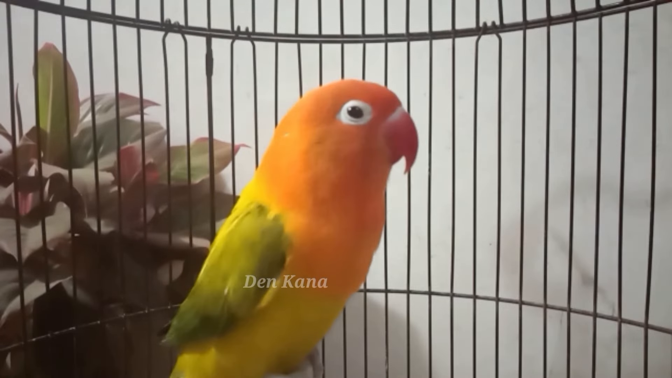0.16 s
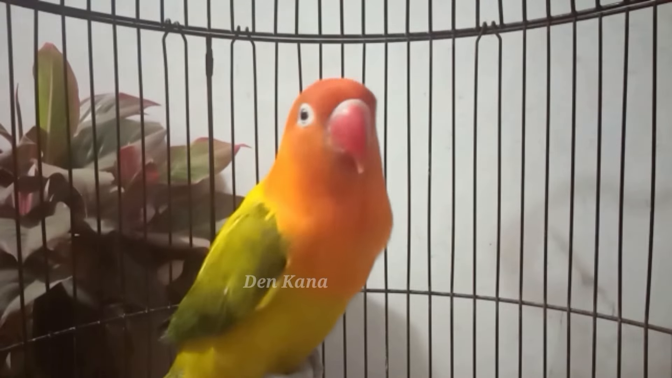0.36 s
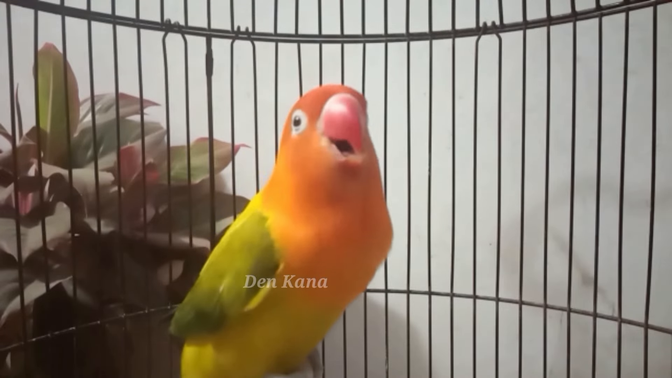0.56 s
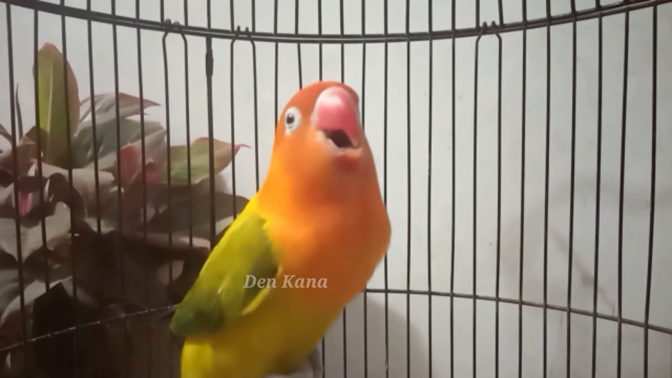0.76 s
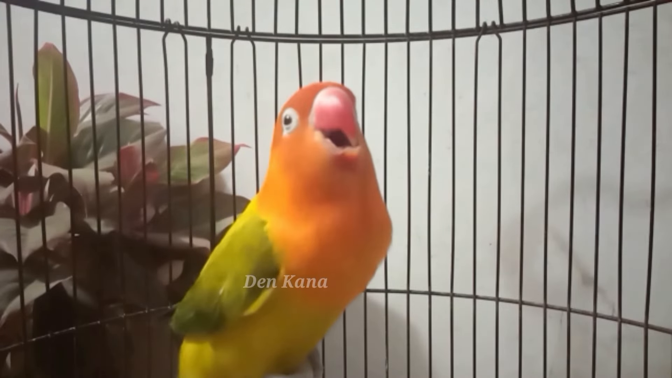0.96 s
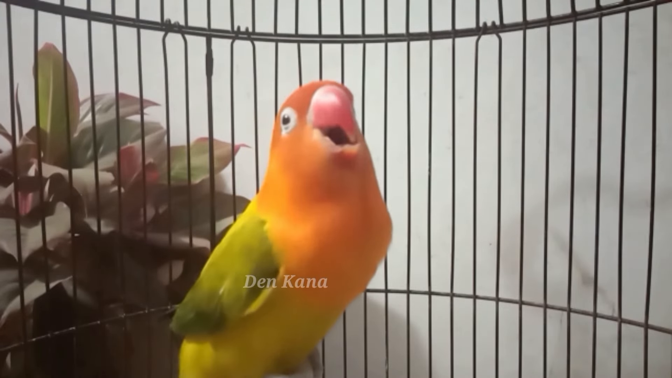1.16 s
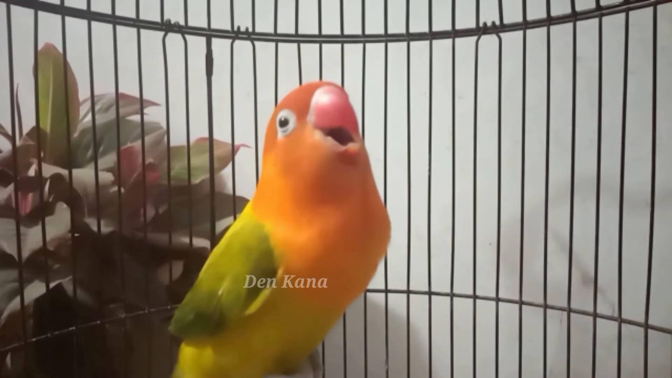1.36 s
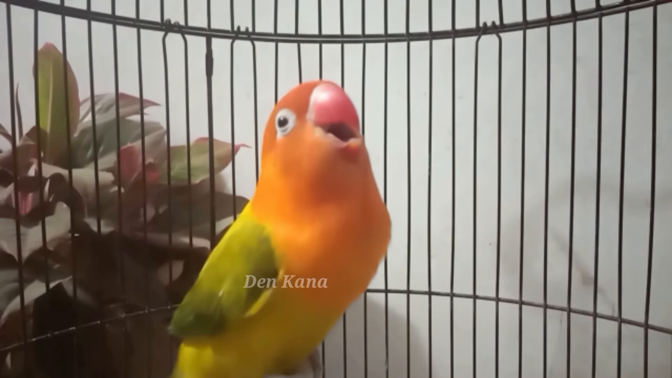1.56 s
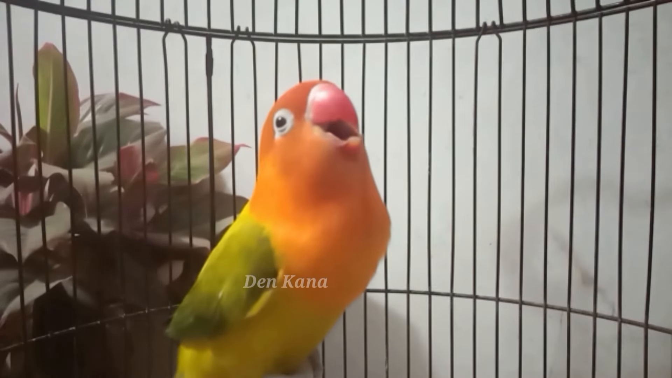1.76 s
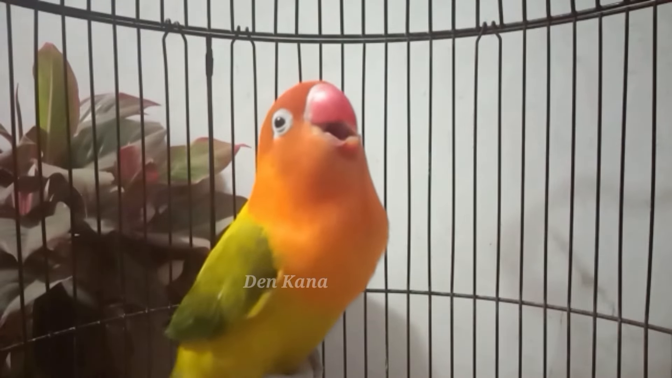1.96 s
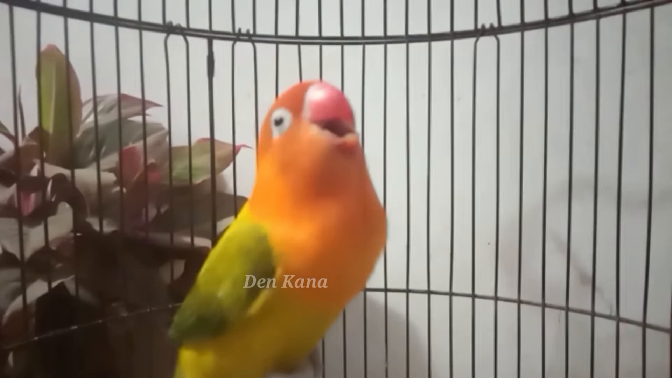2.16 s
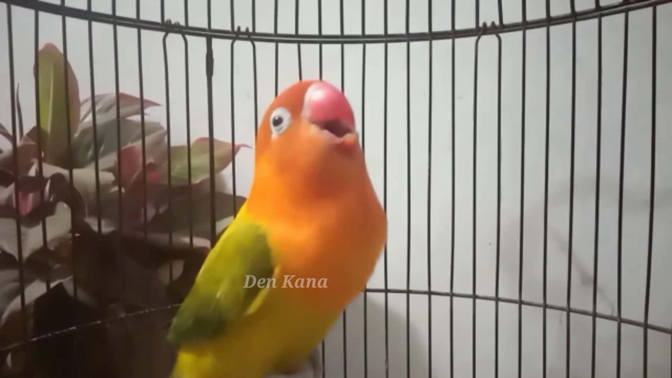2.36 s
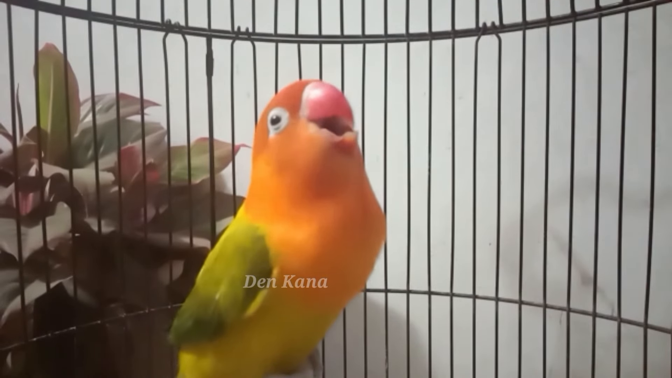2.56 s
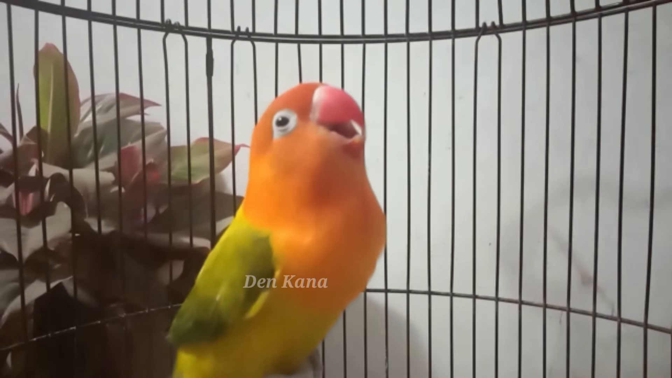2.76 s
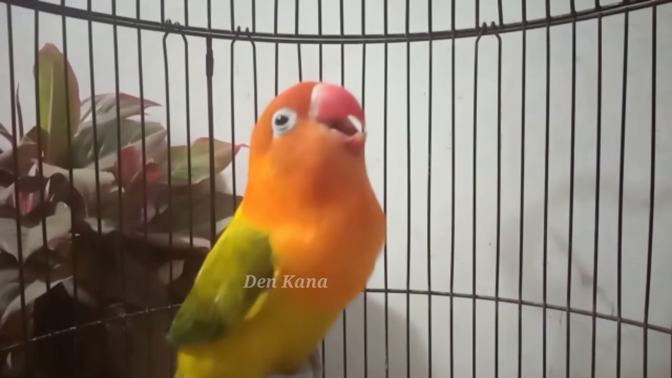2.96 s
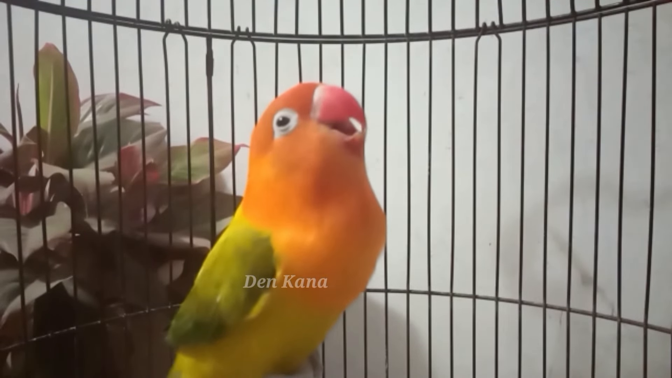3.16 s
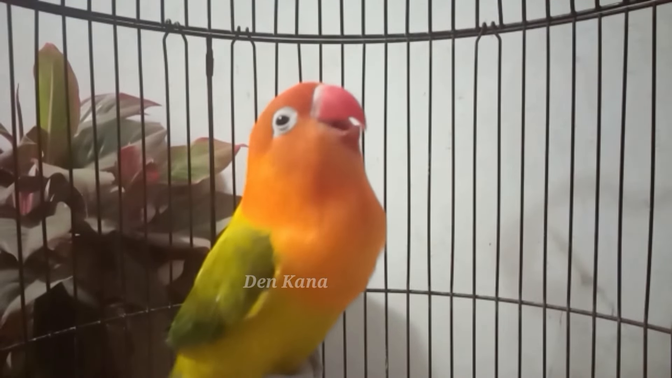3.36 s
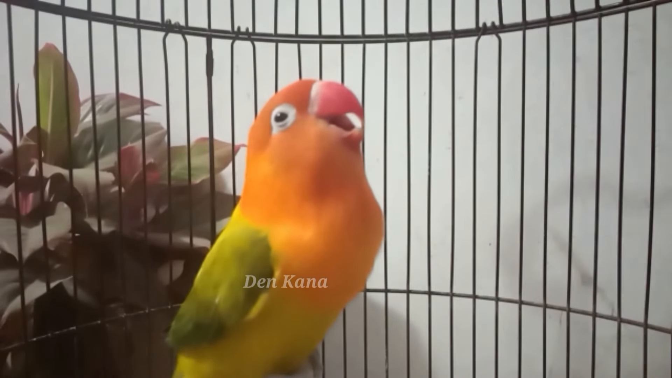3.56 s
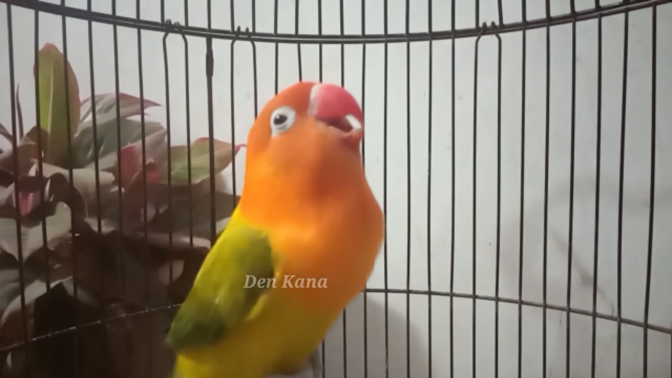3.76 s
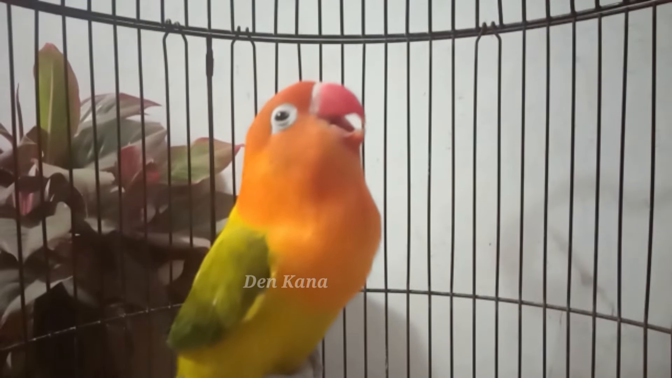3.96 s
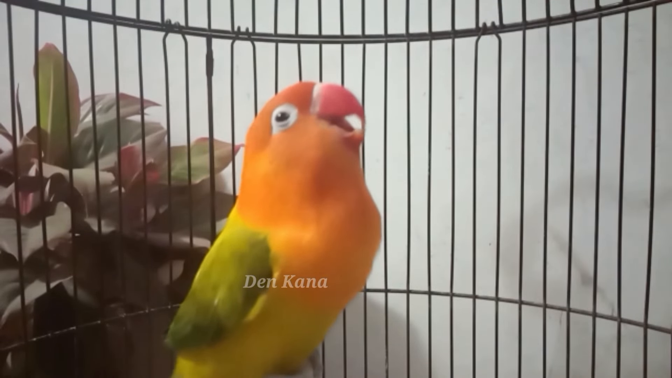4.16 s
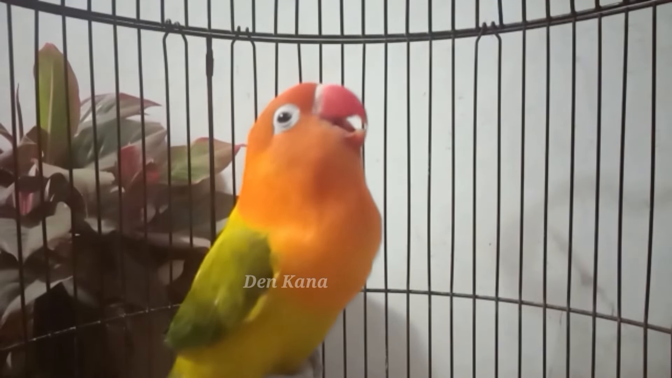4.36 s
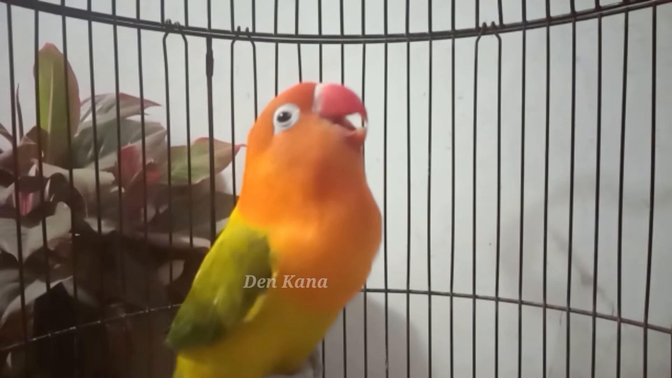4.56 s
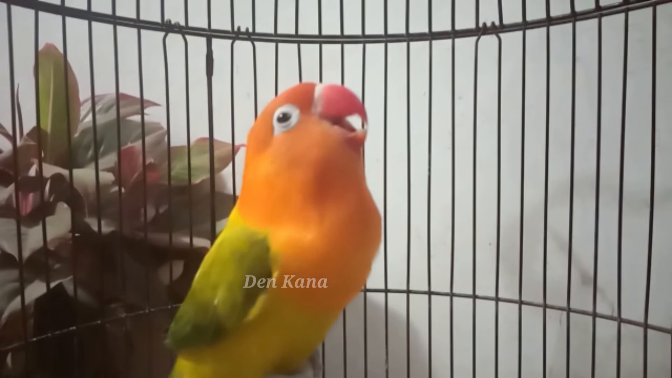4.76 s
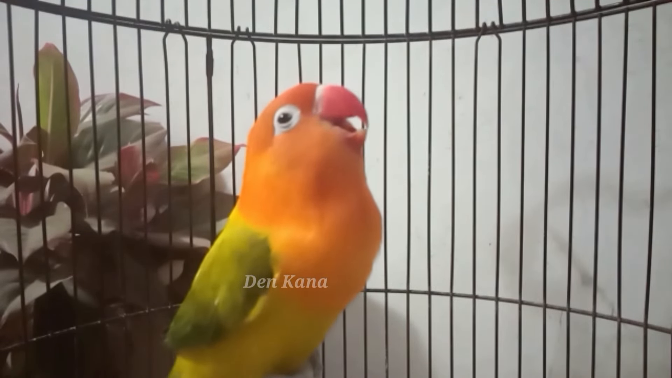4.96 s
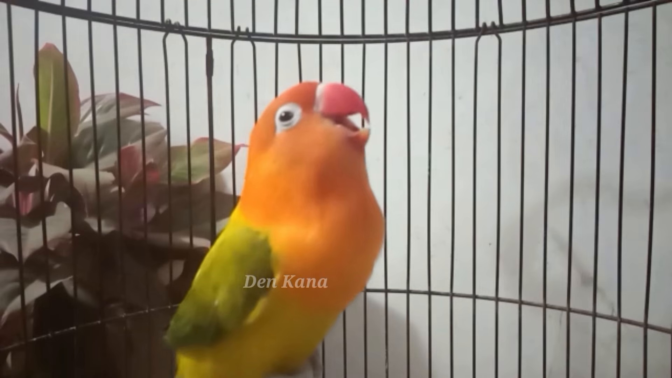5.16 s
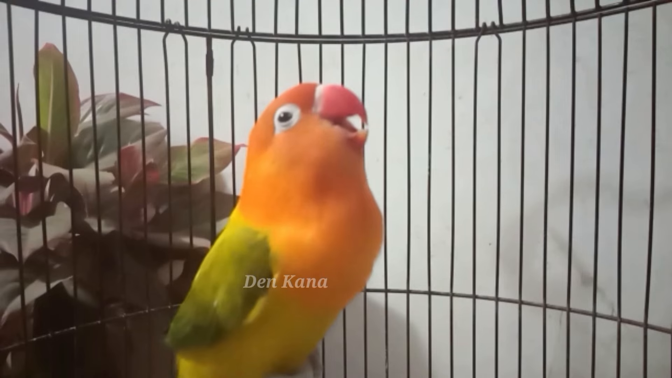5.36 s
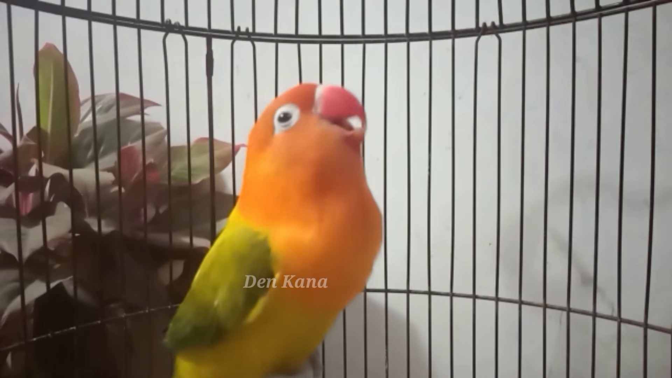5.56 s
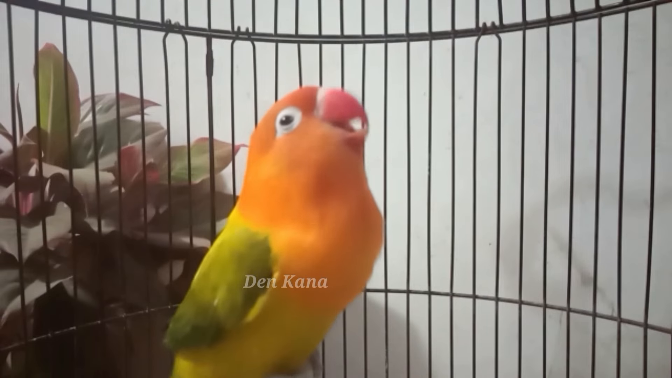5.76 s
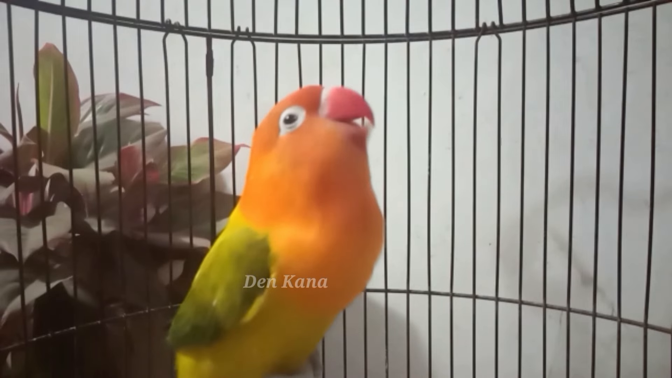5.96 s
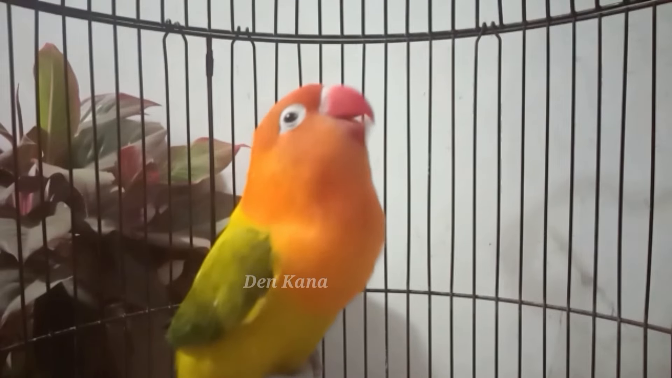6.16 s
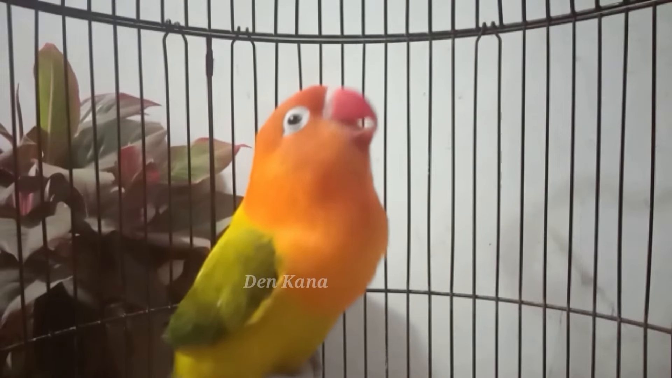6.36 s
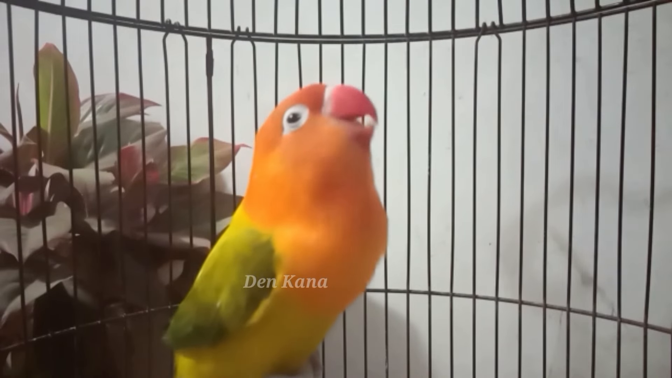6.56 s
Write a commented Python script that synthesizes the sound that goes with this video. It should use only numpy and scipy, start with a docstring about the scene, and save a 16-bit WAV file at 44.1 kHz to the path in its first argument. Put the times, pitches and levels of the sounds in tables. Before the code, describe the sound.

Close, dry-edged chatter from a caged lovebird in a small, ringing hard-walled room. After half a second of quiet hum, hiss and faraway crowing, one harsh note launches a long machine-like run of clicking, buzzing high chirplets. Another bird chatters softly early on and again near the end. The run breaks into a few sliding squeaks, then a steady series of bright upward chirps.

```python
"""A parrot chattering in a hard-walled room

A small caged parrot close to the microphone trills short buzzy notes, then gives rising chirps.
A second bird answers nearby, others call from far off, and a rooster crows outdoors over quiet background noise.
The birds are harmonics on gliding pitches, coloured by a throat; the rooster is one wavering, splitting harmonic.
Echoes and a reverberant tail make the room; shaped noise makes the puffs of air and the background."""
import sys
import numpy as np
from scipy import signal
from scipy.fft import rfft, irfft
from scipy.io import wavfile

SR = 44100
rng = np.random.default_rng(int(sys.argv[2]) if len(sys.argv) > 2 else 0)


def digitize_waveform(pressure):
    """Quantize a signal to 16-bit integers and store it at the path in sys.argv[1].

    Rows of a 2-D input are taken as channels; values are limited to [-1, 1].
    """
    field = np.atleast_2d(pressure).T
    bounded = np.clip(field, -1, 1)
    quanta = np.round(bounded * 32767).astype(np.int16)
    wavfile.write(sys.argv[1], SR, quanta)


N = 291060  # length in samples


def from_db(db):
    """Turns decibels into a gain."""
    return 10 ** (np.asarray(db) / 20)


def at_hz(points, hz):
    """Reads a (Hz, value) table between its rows, on a log-frequency axis."""
    table_hz, values = np.transpose(points)
    return np.interp(np.log(hz), np.log(table_hz), values)


def band(x, low_hz, high_hz):
    """Keeps mainly the frequencies between two limits."""
    return signal.sosfilt(signal.butter(2, [low_hz, high_hz], "band", fs=SR, output="sos"), x)


def wobble(count, hz):
    """A wandering line joining random points of spread 1, with hz points per second."""
    points = rng.standard_normal(int(count * hz / SR) + 2)
    return np.interp(np.arange(count) * hz / SR, np.arange(len(points)), points)


def add(out, s, sound):
    """Mixes a sound into out, starting at s seconds."""
    i = round(s * SR)
    out[i:i + len(sound)] += sound[:N - i]


# Colour of the background noise. Each row: frequency in Hz, strength in dB per Hz (only the balance matters).
NOISE_SPECTRUM = [(18, -61), (30, -8.5), (141, -10), (526, -17), (866, -18.5), (1100, -23.5), (6720, -25.5),
                  (7670, -16.5), (16000, -96)]
# The background noise is quieter during the trill and partly comes back later.
# Each row: time in seconds, level in dB before a slow random drift.
NOISE_LEVEL = [(0.0, -53.5), (1.3, -59.5), (3.0, -61), (3.8, -57.5), (5.2, -55.5), (6.6, -57)]


def background_noise():
    """Rumble and hiss: random noise with a shaped spectrum, its level dipping during the trill."""
    hz = np.maximum(np.arange(N // 2 + 1) * SR / N, 20)
    noise = irfft(rfft(rng.standard_normal(N)) * from_db(at_hz(NOISE_SPECTRUM, hz)), N)
    level_db = np.interp(np.arange(N) / SR, *np.transpose(NOISE_LEVEL))
    return from_db(level_db + 2.2 * wobble(N, 3.12)) * noise / np.std(noise)


# How long the room rings. Each row: frequency in Hz, seconds to fall by 60 dB before the stretch in room().
RING_TIME = [(1500, 0.72), (4000, 0.85), (8000, 0.94), (15000, 0.42)]


def room(x, stretch=0.9, rise_ms=6):
    """Dense reflections: bands of fading noise, each with its own ring time, with total energy 1."""
    t = np.arange(round(1.2 * SR)) / SR
    edges = 500 * 2 ** np.arange(0, 5.1, .5)     # half-octave bands
    tail = np.zeros(len(t))
    for low, high in zip(edges, edges[1:]):
        ring_s = stretch * at_hz(RING_TIME, np.sqrt(low * high))
        tail += band(rng.standard_normal(len(t)), low, high) * from_db(-60 * t / ring_s)
    tail *= 1 - np.exp(-(t * 1000 / rise_ms) ** 2)
    return signal.fftconvolve(x, tail / np.sqrt(np.sum(tail ** 2)))[:N]


# Near echoes off cage, table and walls. Each row: delay in ms, level in dB.
NEAR_ECHOES = [(3.5, -10.5), (8, -17), (13, -18.5), (36, -20.5)]


def echoes(x):
    """A few single reflections: delayed, quieter copies of the sound."""
    out = np.zeros(N)
    for ms, db in NEAR_ECHOES:
        add(out, ms / 1000, from_db(db) * x)
    return out


# End of a low rooster's crow.
# Each row: seconds after its start, pitch in Hz, level in dB before waver and mix, hoarseness from 0 to 1.
LOW_ROOSTER = [(0.0, 885, -43.5, 0.23), (0.319, 863, -49, 0.44), (.42, 810, -44.5, 0.42),
               (.55, 777, -57, 0.7)]
# A higher rooster's crow.
# Each row: seconds after its start, pitch in Hz, level in dB before waver and mix, hoarseness from 0 to 1.
HIGH_ROOSTER = [(0.0, 1215, -43.5, 0.39), (.05, 1232, -42.5, 0.24), (0.14, 1225, -45, 0.32),
                (0.2, 1205, -48, 0.95), (.58, 1195, -49, .9), (.67, 1134, -69, 0.6)]
# When the higher crow starts. Each entry: start in seconds.
HIGH_ROOSTER_STARTS = [.65, 3.6]
GROWL_HZ = 115     # average spacing of the lines a hoarse crow splits into
CROW_WAVER_DB = 2.5


def rooster():
    """Far crows: one harmonic carries, and splits and spreads as the voice turns hoarse."""
    out = np.zeros(N)
    for start, rows in [(0.0015, LOW_ROOSTER)] + [(s, HIGH_ROOSTER) for s in HIGH_ROOSTER_STARTS]:
        s, hz, db, hoarseness = np.transpose(rows)
        t = np.arange(s[0], s[-1], 1 / SR)
        hoarse = np.interp(t, s, hoarseness)
        pitch = np.interp(t, s, hz) * (1 + 0.0806 * hoarse * wobble(len(t), 250))
        turns = np.cumsum(pitch) / SR
        growl = np.cumsum(GROWL_HZ * (1 + 0.124 * wobble(len(t), 15))) / SR
        clear = np.sin(2 * np.pi * turns)
        # two extra lines below the pitch
        split = 0.94 * np.sin(2 * np.pi * (turns - growl)) + 0.53 * np.sin(2 * np.pi * (turns - 2 * growl))
        voice = (1 - 0.51 * hoarse) * clear + hoarse * split
        add(out, start, voice * from_db(np.interp(t, s, db) + CROW_WAVER_DB * wobble(len(t), 26.3)))
    return out


# How throat and beak colour a voice. Each row: frequency in Hz, boost in dB before the "narrow" factor.
THROAT = [(1600, -20), (2200, -8), (3600, 3), (4400, -7.5), (5300, 3), (6400, 2.5), (8300, 2), (9600, -8),
          (10500, -12), (13000, -8), (15300, -13), (15900, -38)]


def syrinx(rows, slope_db, jitter, effort, narrow, unsteady):
    """Harmonics of a membrane through the throat; effort makes soft parts purer, fast glides turn rough."""
    s, hz, db = np.transpose(rows)
    t = np.arange(s[0], s[-1], 1 / SR)
    glide, level_db = np.interp(t, s, hz), np.interp(t, s, db)
    speed = np.abs(np.gradient(np.log(glide))) * SR / 1000      # relative pitch change per ms
    lingering = signal.lfilter([.008], [1, -.992], speed)       # the unrest outlasts the glide
    rough = np.minimum(unsteady * lingering, .25)
    pitch = glide * (1 + (jitter + rough) * wobble(len(t), 1199))

    k = np.arange(1, 9)[:, None]     # harmonic numbers
    per_harmonic_db = slope_db + effort * (level_db - np.max(db))
    heights = from_db(narrow * at_hz(THROAT, k * pitch) + per_harmonic_db * (k - 1))
    heights *= k * pitch < .36 * SR     # leave out the very highest harmonics
    heights /= np.sqrt(np.sum(heights ** 2, axis=0))
    lag = .15 * k ** 2      # upper harmonics leave the throat late
    phase = 2 * np.pi * np.cumsum(pitch) / SR
    tone = np.sum(heights * np.cos(k * phase - lag), axis=0)
    tone *= 1 + (0.057 + 1.24 * rough) * wobble(len(t), 4000)      # cycle-to-cycle unevenness
    # air hissing past the membrane
    tone += from_db(-26.5) * band(rng.standard_normal(len(t)), 3300, 17000)
    edges = np.minimum(1, np.minimum(t - s[0], s[-1] - t) * 1000 / 0.38)     # 0.38 ms fades
    return tone * edges * from_db(level_db + 1.68 * wobble(len(t), 500))


def phrases(contours, slope_db, jitter=0.0079, effort=0.42, narrow=0.8, unsteady=0.65):
    """Sings each contour at its time; narrow = how strongly a half-closed beak colours the sound."""
    out = np.zeros(N)
    for rows in contours:
        add(out, rows[0][0], syrinx(rows, slope_db, jitter, effort, narrow, unsteady))
    return out


# Far birds, heard only through the building.
# Each row: start in seconds, length in seconds, first pitch in Hz, last pitch in Hz, peak in dB before the room.
FAR_GLIDES = [(0.0, 0.092, 2684, 2610, -52.5), (0.083, 0.11, 2138, 2415, -38.5),
              (0.177, 0.057, 2530, 3557, -30), (0.262, 0.055, 2900, 3625, -35.5),
              (2.716, 0.073, 3196, 3750, -30), (2.855, 0.083, 3000, 3366, -29.5),
              (3.675, 0.06, 2430, 2930, -35), (4.936, 0.046, 4180, 3470, -27.5),
              (5.021, 0.045, 4660, 5200, -30.5), (5.079, 0.037, 3730, 3780, -23.5)]


def far_birds():
    """Each call is one straight pitch glide that swells quickly and then fades."""
    share = np.array([0, 0.063, 1])     # start, loudest point and end, as shares of the length
    edge_db = np.array([-4, 0, -4])
    calls = [np.transpose([s + share * length, from_hz + share * (to_hz - from_hz), db + edge_db])
             for s, length, from_hz, to_hz, db in FAR_GLIDES]
    return phrases(calls, slope_db=-3.0, jitter=0.058)


# The neighbour holds a pitch, then jumps and glides.
# Each row: start in seconds, hold in ms, hold pitch in Hz, hold level in dB, glide in ms,
# glide's first pitch in Hz, glide's last pitch in Hz, glide's peak level in dB.
NEIGHBOUR_CALLS = [(0.834, 9, 2436, -20.5, 4, 3940, 4200, -23),
                   (0.859, 24.2, 2423, -19.5, 36, 3340, 4200, -16.5),
                   (0.92, 11, 2476, -17.5, 6.9, 4690, 4760, -20),
                   (.922, 7.9, 3860, -20, 16, 3680, 3560, -19.5),
                   (1.0, 21.7, 2540, -22, 9, 4150, 4740, -19),
                   (1.035, 10.7, 3620, -30, 12, 4360, 3770, -19.5),
                   (1.063, 10.6, 4000, -29, 12, 4710, 4400, -25),
                   (5.963, 26, 2384, -22.5, 39, 3300, 3640, -17),
                   (6.021, 3.5, 3650, -16, 4.7, 2850, 2200, -17.5),
                   (6.104, 20.5, 2240, -23, 6.7, 3270, 4670, -19.5)]
JUMP_MS, HOLD_RISE, HOLD_SWELL_DB = 2.42, 0.025, 5     # the rise is a share of the held pitch
GLIDE_HALFWAY = 0.373     # share of the glide's pitch change done by half time


def neighbour_bird():
    """A swelling hold, a quick jump, then a glide loudest in its middle."""
    calls = []
    for s, hold_ms, hold_hz, hold_db, glide_ms, from_hz, to_hz, db in NEIGHBOUR_CALLS:
        t = s + np.cumsum([0, hold_ms, JUMP_MS, glide_ms / 2, glide_ms / 2]) / 1000
        middle_hz = from_hz + GLIDE_HALFWAY * (to_hz - from_hz)
        pitch_hz = [hold_hz * (1 - HOLD_RISE), hold_hz, from_hz, middle_hz, to_hz]
        level_db = [hold_db - HOLD_SWELL_DB, hold_db, db - 2, db, db - 2]
        calls.append(np.transpose([t, pitch_hz, level_db]))
    return phrases(calls, slope_db=-12.0, jitter=0.018, effort=0.046, narrow=0.92, unsteady=0.39)


# The closing chirp. Each row: seconds after its start, pitch in Hz, level in dB before each chirp's own changes.
CHIRP_SHAPE = [(0.0, 1735, -31), (.008, 1832, -19), (.013, 3515, -15), (0.016, 3630, -9.5),
               (0.018, 3725, -11.5), (0.0233, 3930, -4.5), (.027, 4130, -17), (.031, 4350, -12.5),
               (.0325, 5900, -20), (0.037, 5840, -19), (0.038, 5140, -9), (.046, 4900, -17)]
# When it is sung. Each row: start in seconds, level change in dB, share of the top leap.
CHIRP_TIMES = [(5.922, -2, 0.43), (6.0239, -1.6, 1), (6.126, -1.5, 0.94), (6.227, -1, 0.94),
               (6.329, -2.5, .99), (6.433, -2, 0.96), (6.5378, -2.5, 0.85)]
LEAP_ABOVE_HZ = 5000


def chirps():
    """One rising contour, tuned a little differently each time; some leap less high."""
    sung = []
    for s, level_db, leap in CHIRP_TIMES:
        t, hz, db = np.transpose(CHIRP_SHAPE)
        leaping_hz = np.minimum(hz, LEAP_ABOVE_HZ) + leap * np.maximum(hz - LEAP_ABOVE_HZ, 0)
        sung.append(np.transpose([s + t, rng.normal(1, .008) * leaping_hz, db + level_db]))
    return phrases(sung, slope_db=-9.5, jitter=0.014, effort=0.032, narrow=0.31, unsteady=0.1)


# The harsh opening note. Each row: time in seconds, pitch in Hz, level in dB.
OPENING_NOTE = [(.532, 3040, -19), (.5348, 3300, -21), (.5362, 4980, -8), (.539, 4900, -10),
                (.5402, 3850, -13), (.5418, 4900, -10.5), (.5465, 4980, -11.5), (.549, 3400, -18),
                (.552, 3950, -14), (.555, 2600, -19), (.558, 1750, -24)]
# Bent notes that glide to a turning pitch and away.
# Each row: start in seconds, ms to the turn, ms after it, ms held at the end, start pitch in Hz, turn pitch in Hz,
# end pitch in Hz, peak in dB, how early the first glide levels off (1 to 4).
BENT_NOTES = [(0.607, 1.7, 3.9, 4, 3140, 2770, 3740, -18, 1.1),
              (.661, 3, 3.9, 1.5, 3700, 3820, 3370, -23, 1.4),
              (5.647, 21, 2.4, 1.8, 2395, 1970, 1980, -12.5, 1.24),
              (5.723, 13, 26, 7.9, 4080, 2026, 2955, -14.5, 3.9),
              (5.819, 36.7, 3.3, 2.3, 4340, 2960, 4970, -12, 1.3)]
BENT_ATTACK_DB, BENT_RELEASE_DB, BENT_HOLD_DB = -5, -6, -2     # the hold fades further from the release


def free_notes():
    """The rough opening note, and notes whose glide slows towards the turn, leaves it and lingers."""
    notes = []
    away = np.linspace(-1, 1, num=21)     # -1 at the start, 0 at the turn, 1 after it
    before = away < 0
    for s, in_ms, out_ms, held_ms, start_hz, turn_hz, end_hz, db, curve in BENT_NOTES:
        t = s + (in_ms + away * np.where(before, in_ms, out_ms)) / 1000
        bend_hz = np.where(before, start_hz, end_hz) - turn_hz
        hz = turn_hz + bend_hz * np.abs(away) ** np.where(before, curve, 1.3)
        fade_db = np.where(before, BENT_ATTACK_DB, BENT_RELEASE_DB) * np.abs(away) ** 3
        rows = np.transpose([t, hz, db + fade_db])
        notes.append(np.vstack([rows, rows[-1] + [held_ms / 1000, 0, BENT_HOLD_DB]]))
    opening = phrases([OPENING_NOTE], slope_db=0.0, jitter=0.014, narrow=0.7, unsteady=0.22)
    return opening + phrases(notes, slope_db=-0.7, jitter=0.017, effort=0.13, narrow=0.99)


# The trill's notes. Each row: time in seconds, level in dB, rough time to the upward snap in ms.
TRILL_NOTES = [(0.596, -8.5, 0.32), (0.6525, -9.5, 0.94), (0.7103, -9.5, 0.52), (0.7653, -8.5, 1.83),
               (0.823, -7.5, 1.86), (0.8846, -12, 2.6), (0.9436, -10, 2.55), (1.004, -9.5, 2.5),
               (1.0651, -9, 1.63), (1.1291, -10, 2.2), (1.193, -10.5, 2.9), (1.259, -11.0, 2.27),
               (1.3231, -9.5, 2.45), (1.3894, -10.5, 1.94), (1.4561, -12, 2.5), (1.5232, -10.5, 3.06),
               (1.593, -11.5, 3.4), (1.662, -10.5, 2.23), (1.7309, -10.5, 3.6), (1.8035, -11, 2.44),
               (1.8746, -12.0, 5.5), (1.9464, -12.5, 2.97), (2.0191, -11, 3.3), (2.092, -11.5, 3.3),
               (2.1642, -12, 3.54), (2.236, -11, 4.2), (2.3094, -13, 5.1), (2.3826, -11.5, 4.2),
               (2.457, -13, 7.5), (2.5325, -11.5, 3.4), (2.6038, -11, 5.3), (2.681, -11.5, 3.35),
               (2.7543, -12, 6.4), (2.8318, -10.5, 3.74), (2.9077, -10.5, 3.9), (2.9834, -10, 3.9),
               (3.0581, -10.5, 5.1), (3.1357, -10.5, 6.1), (3.212, -11, 4.95), (3.2889, -13.5, 6.7),
               (3.3668, -13, 6.1), (3.4431, -11, 5.9), (3.5209, -8.5, 4.15), (3.5979, -9, 4.6),
               (3.678, -13.5, 2.64), (3.753, -9.5, 4.6), (3.829, -10.5, 6.1), (3.9055, -11, 5.4),
               (3.983, -9, 5.1), (4.0609, -9, 4.25), (4.1405, -8.5, 3.2), (4.219, -9.5, 2.94),
               (4.298, -10, 4.3), (4.376, -9.5, 4.5), (4.4539, -9.5, 4.6), (4.5342, -9.5, 4.9),
               (4.6141, -11, 4.6), (4.695, -10.0, 5.1), (4.7742, -10, 5.3), (4.8519, -11.5, 5.3),
               (4.9323, -11, 5.2), (5.0125, -9, 3.2), (5.0903, -9.5, 6.8), (5.1709, -10, 4.5),
               (5.249, -10, 5.6), (5.3289, -9.5, 7.8), (5.4047, -10, 10.8), (5.485, -10.5, 14.5),
               (5.5722, -10, 12.8)]
# Air puff with each trill note and beak tick before it.
# Each row: time in seconds, puff dB before roughening and filtering, tick dB, how many ms the tick leads the note.
BEAK_SOUNDS = [(.6, -41.5, -62, 21), (1.3, -40.5, -43, 22.6), (2.599, -41.5, -44.5, 30.5),
               (3.2, -46, -48.5, 26.3), (4.6, -52, -43.5, 33), (5.45, -46.5, -46, 26)]
TICK_HZ, TICK_MS = 1400, .5     # pitch, and time to the tick's strongest moment


def beak():
    """A low puff of air with each note, a faint tick as the beak resets, one bump on the perch."""
    s, puff_db, tick_db, lead_ms = np.transpose(BEAK_SOUNDS)
    puffs, ticks, bump = np.zeros(N), np.zeros(N), np.zeros(N)
    push = np.hanning(round(0.0084 * SR))
    ms = np.arange(200) * 1000 / SR
    tick_fade = np.e * ms / TICK_MS * np.exp(-ms / TICK_MS)
    tick = np.sin(2 * np.pi * TICK_HZ * ms / 1000) * tick_fade
    for start, _, _ in TRILL_NOTES:
        puff_change_db, tick_change_db = rng.normal(0, 0.22, 2)
        add(puffs, start + 0.00084, push * from_db(np.interp(start, s, puff_db) + puff_change_db))
        tick_s = start - np.interp(start, s, lead_ms) / 1000
        add(ticks, tick_s, tick * from_db(np.interp(start, s, tick_db) + tick_change_db))
    add(bump, 5.753, np.hanning(round(0.0012 * SR)) * from_db(-31))
    rough_puffs = puffs * (1 + 3.24 * rng.standard_normal(N))
    return band(rough_puffs, 97, 750) + ticks + band(bump, 60, 1300)


# The trill's pitch drifts. Each row: time in seconds, held pitch in Hz, pitch where the snap lands in Hz,
# pitch at the end in Hz (all before a small random scatter), tail in ms before hurrying.
TRILL_DRIFT = [(0.599, 3080, 3900, 4660, 4.6), (.653, 2980, 4640, 3860, 4.9), (.71, 2760, 4290, 4830, 3.8),
               (.8, 2390, 3720, 4400, 2), (1.2, 2330, 3826, 4340, 4), (3.1, 2182, 3707, 4370, 5),
               (3.4, 2087, 3558, 4240, 3.3), (4.2, 2134, 3580, 4140, 5.2), (5.33, 2147, 3500, 4300, 3.8),
               (5.409, 2242, 4850, 4900, 13.4), (5.49, 2222, 4850, 4870, 11), (5.57, 2104, 3880, 4200, 2.9)]
HOLD_SCATTER, TOP_SCATTER = 0.011, 0.0074     # random spread, as a share of the pitch
FULL_NOTE_MS, QUICKEST_END = 3.4, 0.85   # notes that snap sooner are hurried; least share left of snap and tail
SNAP_MS, SAG_PER_MS = 1.1, 0.0075     # snap time before hurrying; share of pitch lost per ms of hold


def trill():
    """Each note holds a low buzzy pitch that sags, bends up, snaps high and dies."""
    notes = []
    drift_s, *drifts = np.transpose(TRILL_DRIFT)
    for s, db, snap_ms in TRILL_NOTES:
        hold_hz, top_hz, end_hz, tail_ms = [np.interp(s, drift_s, drift) for drift in drifts]
        hold_hz *= 1 + HOLD_SCATTER * rng.standard_normal()
        lift = 1 + TOP_SCATTER * rng.standard_normal()
        pace = min(snap_ms / FULL_NOTE_MS, 1)
        hold_ms = max(snap_ms - 2.428 * pace, .1)
        end = QUICKEST_END + (1 - QUICKEST_END) * pace
        # onset, settling, hold, bend, snap, tail
        ms = np.cumsum([-.5, .5 + 0.692 * pace, hold_ms, 1.32 * pace, SNAP_MS * end, tail_ms * end])
        sagged = hold_hz * (1 - SAG_PER_MS * hold_ms)
        pitch_hz = [hold_hz, 1.0175 * hold_hz, sagged, 1.149 * sagged, lift * top_hz, lift * end_hz]
        level_db = db + np.array([-12, -3, -2.5, 0.5, -1.5, -12.5])
        notes.append(np.transpose([s + ms / 1000, pitch_hz, level_db]))
    return phrases(notes, slope_db=-0.5, jitter=0.021, effort=0.26, narrow=1.0, unsteady=0.59)


def scene():
    """The near bird with its echoes and room, the neighbour wetter, far birds all room."""
    bird = trill() + free_notes() + chirps()
    neighbour = neighbour_bird()
    far = far_birds()
    crow = rooster()
    near = bird + neighbour
    near_room = room(from_db(-13) * bird + from_db(-10.5) * neighbour)
    far_room = room(far + 0.33 * crow, stretch=0.93, rise_ms=1.6)
    mix = near + echoes(near) + near_room + far_room + 0.45 * crow + beak() + background_noise()
    return mix[None]


def record(dry):
    """The lowest rumble and the top are cut."""
    low_cut = signal.sosfilt(signal.butter(4, 55, "high", fs=SR, output="sos"), dry)
    # 60 dB down from 16500 Hz up
    return signal.sosfilt(signal.cheby2(12, 60, 16500, fs=SR, output="sos"), low_cut)


dry = scene()
out = record(dry)
digitize_waveform(out)
```